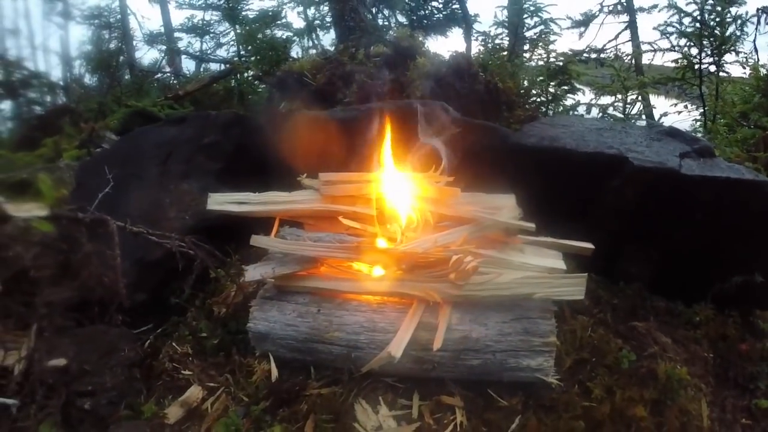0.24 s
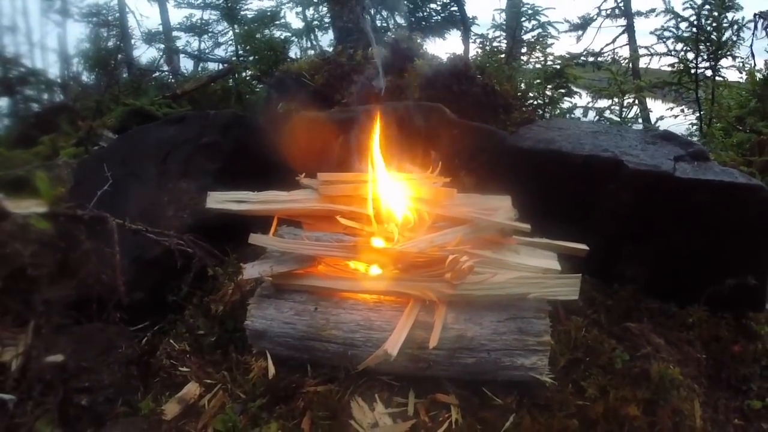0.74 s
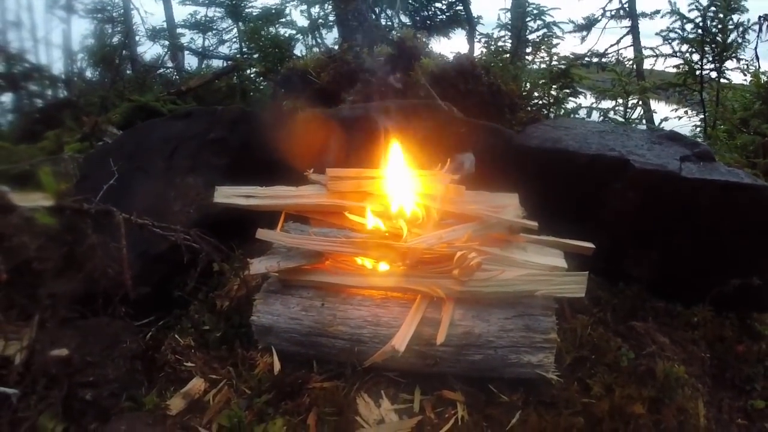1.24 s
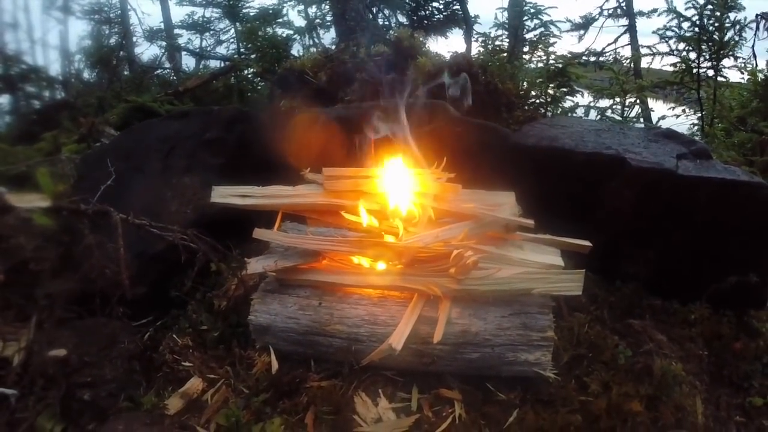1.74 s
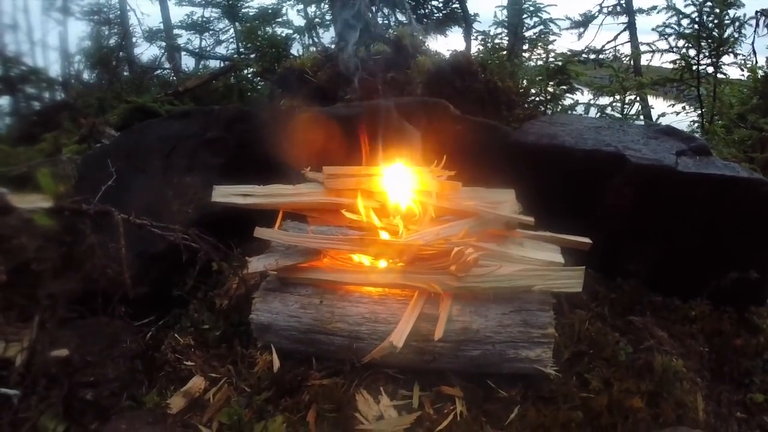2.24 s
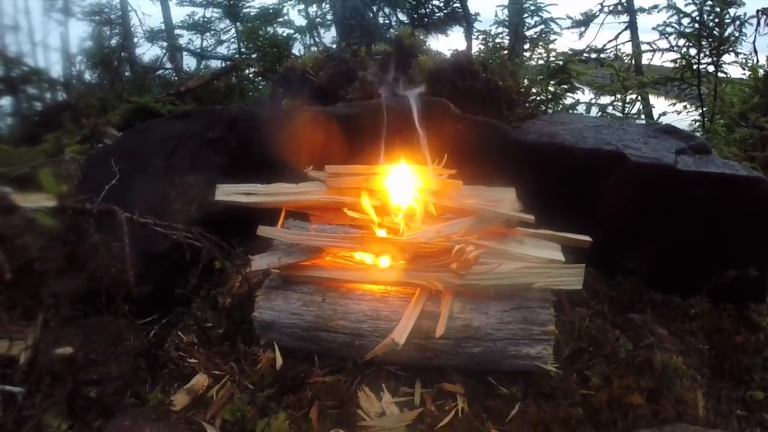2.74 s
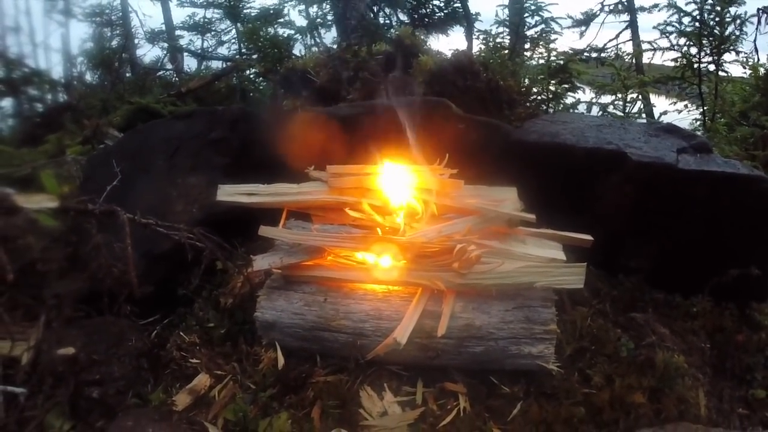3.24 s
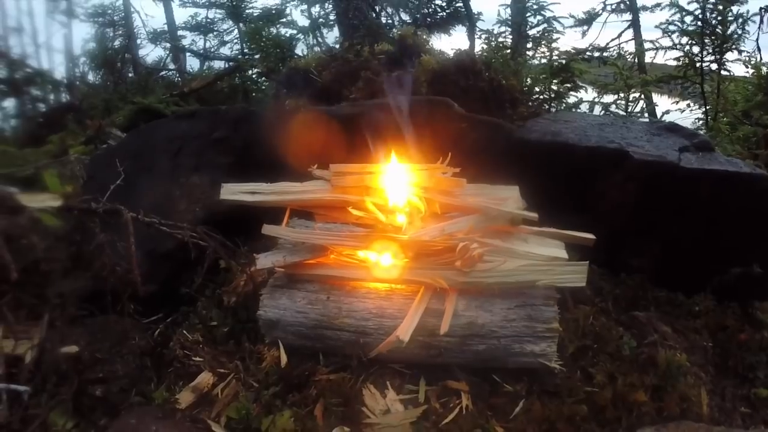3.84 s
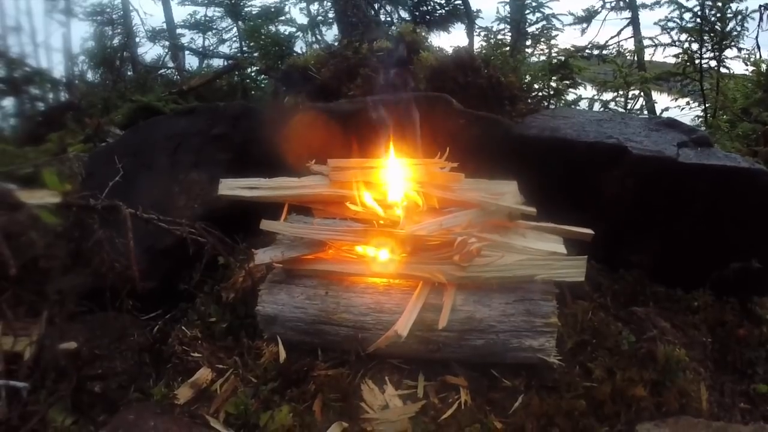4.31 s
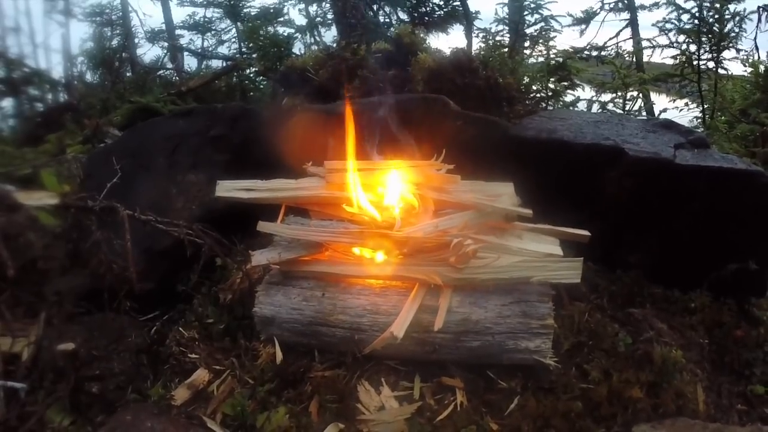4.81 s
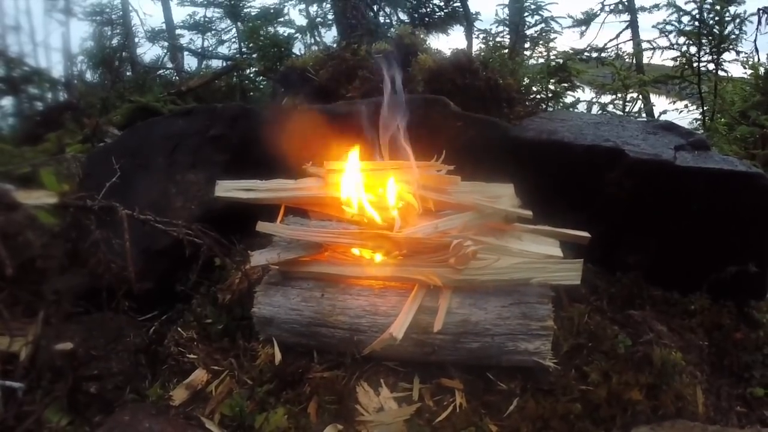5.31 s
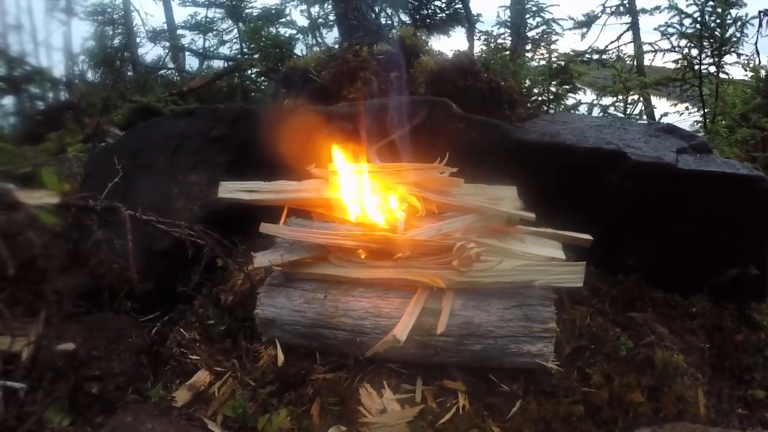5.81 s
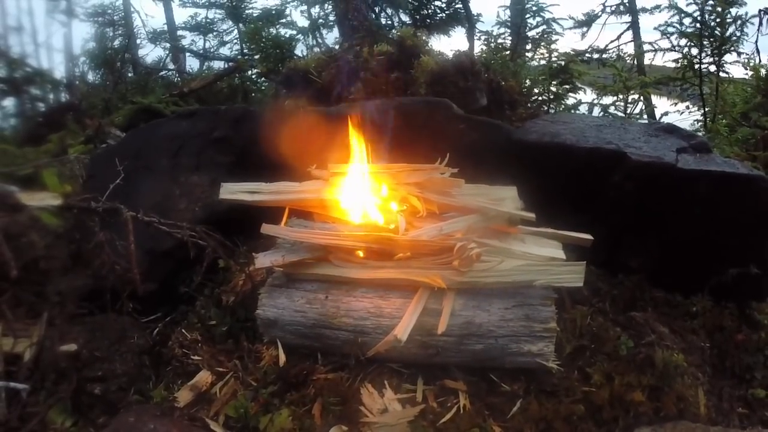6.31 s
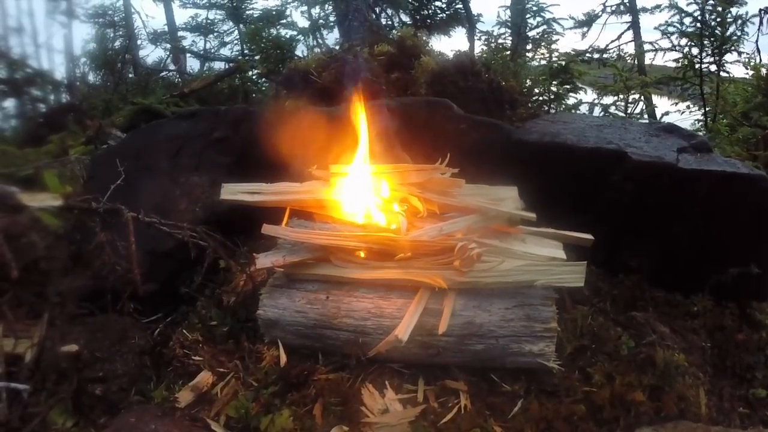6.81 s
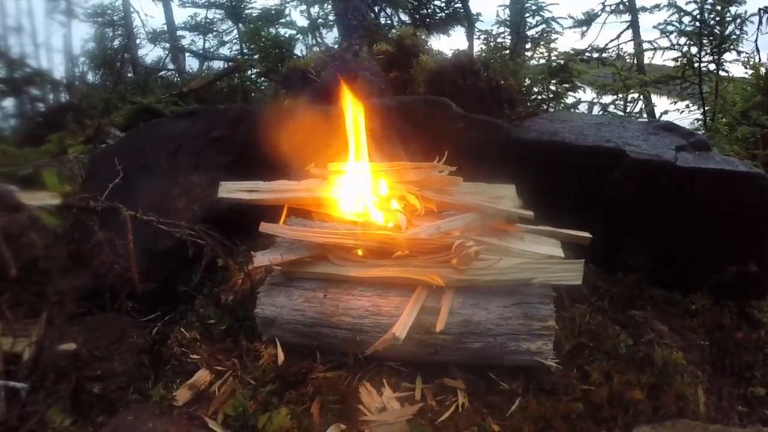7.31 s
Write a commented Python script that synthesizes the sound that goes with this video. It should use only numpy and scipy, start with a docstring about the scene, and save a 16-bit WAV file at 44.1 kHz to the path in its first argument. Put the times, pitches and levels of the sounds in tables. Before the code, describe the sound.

Sparse sharp snaps and tiny ticks come from burning kindling close by, with a soft low flutter of flame underneath.

```python
"""Short dry snaps from a small stack of kindling catching fire outdoors, close to a camera microphone.
Pockets of sap burst, each ringing the same few resonances of the stack and the microphone port.
Under them lie a soft flutter of flame, a faint wavering low hum and the microphone's steady hiss."""
import sys
import numpy as np
from scipy import signal
from scipy.fft import rfft, irfft, next_fast_len
from scipy.io import wavfile
from scipy.ndimage import map_coordinates

SR = 44100
rng = np.random.default_rng(int(sys.argv[2]) if len(sys.argv) > 2 else 0)


def persist_wave(psi):
    """Save psi, clipped to +-1, as 16-bit WAV."""
    counts = np.round(np.clip(psi, -1, 1) * 32767).astype(np.int16)
    wavfile.write(sys.argv[1], SR, np.atleast_2d(counts).T)


N = 332955


def amp(db):
    """dB to gain."""
    return 10 ** (np.asarray(db) / 20)


def unit(x):
    """x at rms 1."""
    return x / np.sqrt(np.mean(x ** 2) + 1e-20)


def wobble(rate_hz):
    """Smooth random curve, rate_hz knots a second."""
    knots = rng.standard_normal(int(N * rate_hz / SR) + 4)
    return map_coordinates(knots, [np.arange(N) * rate_hz / SR])


def filtered(x, response):
    """x filtered by the gain response(hz)."""
    size = next_fast_len(len(x) + 8192)
    return irfft(rfft(x, size) * response(np.fft.rfftfreq(size, 1 / SR)), size)[:len(x)]


def noise(spectrum):
    """Noise at rms 1, shaped by (freq_hz, density_db) points."""
    freq_hz, density_db = np.transpose(spectrum)
    white = rng.standard_normal(N)
    return unit(filtered(white, lambda hz: amp(np.interp(np.log(hz + 1), np.log(freq_hz + 1), density_db))))


def snap(colour_db, size=1400):
    """One sap burst rings the modes; nearby sticks and rock add faint reflections."""
    # Stack and port modes; low ones arrive late, through the logs: freq_hz, level_db, t60_s, delay_ms
    modes = [(1070.0, -24.3, 0.0079, 1.409), (1460.0, -16, 0.017, 1.028), (2070.0, -12.1, 0.0102, 1.181),
             (2510.0, -17.3, 0.0145, 1.044), (3030.0, -15.6, 0.0092, 0.696), (3610.0, -4.0, 0.0083, 0.633),
             (4230.0, -2.7, 0.0085, 0.004), (4810.0, -10.5, 0.009, 0.099), (5600.0, 6.6, 0.0029, 0.134),
             (6040.0, -0.2, 0.006, 0.212), (7010.0, -17.6, 0.0177, 0.214), (7420.0, -4.5, 0.0072, 0.097),
             (8440.0, -25.0, 0.0143, 0.1), (9110.0, -23.5, 0.0135, 0.098), (9920.0, -19.7, 0.0115, 0.158),
             (10960.0, -22.4, 0.0118, 0.105), (11990.0, -7.6, 0.0034, 0.118),
             (13120.0, -23.0, 0.008, 0.176), (14360.0, -23.8, 0.0065, 0.1), (14760.0, -17.1, 0.0029, 0.09)]
    # Tone-curve points, one per colour_db value: freq_hz
    colour_hz = [1200, 2200, 4200, 4800, 5800, 7300, 11000]
    freq_hz, level_db, t60_s, delay_ms = np.transpose(modes)[:, :, None]
    level_jitter, pitch_jitter = rng.standard_normal((2, len(modes), 1))
    time_s = np.arange(size) / SR
    age_s = np.maximum(time_s - delay_ms / 1000, 0)
    start_db = level_db + np.interp(np.log(freq_hz), np.log(colour_hz), colour_db) + 1.3 * level_jitter
    swing = np.sin(2 * np.pi * freq_hz * (1 + 0.0068 * pitch_jitter) * age_s)
    attack = 1 - np.exp(-age_s / 0.00016)
    ring = -np.sum(amp(start_db - 60 * age_s / t60_s) * attack * swing, axis=0)
    scatter_onset = 1 - np.exp(-(time_s / 0.0022) ** 2)
    scatter = amp(-33 - 60 * time_s / 0.02) * scatter_onset * rng.standard_normal(size)
    return ring + np.convolve(ring[:size // 4], scatter)[:size]


def crackle():
    """Bursting sap: timed snaps, plus faint ticks at random."""
    # Sap bursts: start_s, strength_db, knock_db, hollow_db, spit_db
    # Knock lifts the wood modes, hollow the lowest log modes and the 4-5 kHz ring, spit the treble.
    snaps = [(0.5554, -19, -1.5, -6.5, 0.5), (0.9273, -47.5, 6, 0, -3), (1.3359, -43.5, -2, 0, 1),
             (1.6984, -40.5, 1, -1, 0), (1.9773, -44.5, -3, -13, 7), (2.0675, -24.5, -2.5, -1.5, -1),
             (2.2268, -35.5, -3, -5, 4), (2.2694, -50, -4, -8, 1), (2.3559, -51.5, 2, -3, -3),
             (2.4949, -47.5, 9, 1, -2), (2.5752, -48.5, 7, 5, 1), (2.6013, -47, -7, -8, -3),
             (2.7785, -48.5, 0, -4, 1), (2.8489, -44.5, 11, 2, -14), (2.954, -48, -4, 1, 5),
             (2.9693, -41.5, -3, -3, 4), (3.1817, -52.5, 5, 4, 2), (3.308, -53, 0, -1, 1),
             (3.6488, -49, 5, -1, 3), (3.805, -42.5, -3, 2, 3.5), (3.9571, -46.5, 7, -1, -1),
             (4.2144, -52.5, 0, 0, -5), (4.598, -52, 7, 4, 3), (4.6024, -48, 4, 1, 8.5),
             (4.7304, -50.5, 1, -4, -6), (5.082, -37, 3, 1, -3), (5.0989, -34.5, 3.5, 1, -3),
             (5.2237, -43.5, 4, 5, 5), (5.2771, -13, 0.5, -1.5, -3), (5.4527, -46, -6, -5, -1),
             (5.8745, -13, -9.5, 14.5, 0.5), (6.1531, -43.5, 4.5, 4, 6), (6.5043, -21.5, 0, 0.5, 0),
             (6.5817, -35, 1, -5, -5), (6.7878, -43, 8, -1, -2), (7.004, -36, -5, -1, 5),
             (7.2812, -56, -1, -5, 1)]
    ticks_per_s, tick_db = 1.2, -57
    count = round(ticks_per_s * N / SR)
    spread_db = rng.standard_normal((count, 4)) * [1.5, 3, 3, 3]
    ticks = np.c_[rng.uniform(0, N / SR, count), tick_db + spread_db[:, 0], spread_db[:, 1:]]
    out = np.zeros(N + SR)
    for start_s, strength_db, knock_db, hollow_db, spit_db in [*snaps, *ticks]:
        thud_db = -6.5 + knock_db + 1.85 * hollow_db
        burst = snap([thud_db, knock_db, 0.31 * hollow_db, hollow_db, 0, 0.6 * spit_db, spit_db])
        out[round(start_s * SR):][:len(burst)] += amp(strength_db) * burst
    low_cut = signal.butter(2, 650, "high", fs=SR, output="sos")  # small bursts radiate no bass
    return signal.sosfilt(low_cut, out[:N])


def flame():
    """The flame flaps and pushes the air, mostly at 20-40 Hz."""
    # Flutter envelope: time_s, relative_db
    flutter = [(0.0, -63.5), (2.27, -54.5), (2.48, -64), (2.86, -57), (7.11, -59), (7.55, -68)]
    time_s, relative_db = np.transpose(flutter)
    level_db = np.interp(np.arange(N) / SR, time_s, relative_db) - 1
    push = noise([(8, -42), (20, 9.5), (40, 4.5), (60, -20), (200, -59), (400, -120)])
    return amp(level_db) * unit(amp(1.5 * wobble(5.2)) * push)


def hum():
    """Faint low tone, wavering in pitch and level."""
    centre_hz, drift_hz, quiver_hz = 63, 4, 5.5
    mean_db, swell_db, flicker_db = -60.5, 2, 2
    pitch_hz = centre_hz + drift_hz * wobble(2.7) + quiver_hz * wobble(18)
    level_db = mean_db + swell_db * wobble(2.3) + flicker_db * wobble(7)
    return amp(level_db) * np.sin(2 * np.pi * np.cumsum(pitch_hz) / SR)


def hiss():
    """Microphone noise floor, nearly constant in level."""
    # Noise floor shape: freq_hz, relative_density_db
    spectrum = [(12, -27), (20, -5.5), (45, -7.5), (78, -9), (105, -13.5), (200, -15), (565, -20),
                (1100, -23.5), (2440, -27.5), (5000, -33.5), (9000, -42), (13000, -46.5), (15000, -50.5),
                (15500, -79), (17000, -120)]
    level_db = -56.5 + 0.55 * wobble(2.96)
    return amp(level_db) * noise(spectrum)


def scene():
    """Fire over the steady floor, mono."""
    floor = hiss()
    return (crackle() + flame() + hum() + floor)[None]


def record(dry):
    """The camera passes nothing above its band limit."""
    top_hz = 16550
    return filtered(dry[0], lambda hz: hz < top_hz)[None]


dry = scene()
out = record(dry)
persist_wave(out)
```